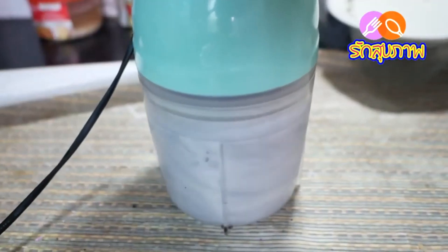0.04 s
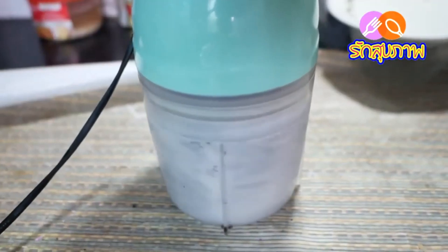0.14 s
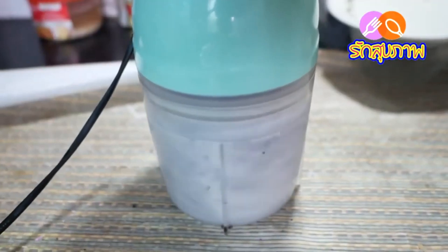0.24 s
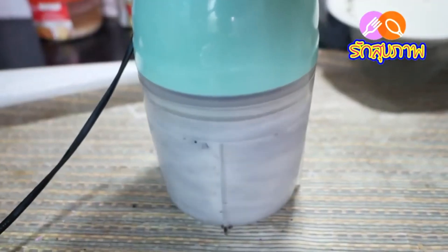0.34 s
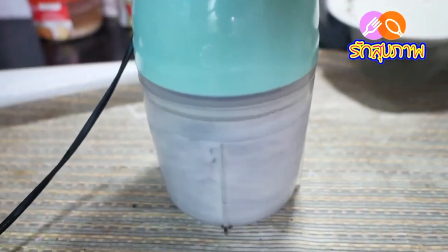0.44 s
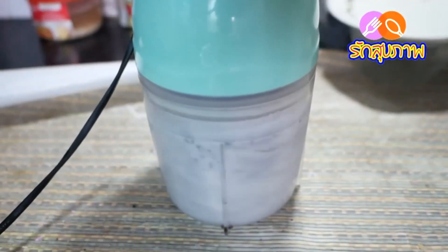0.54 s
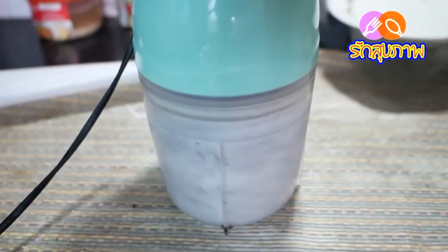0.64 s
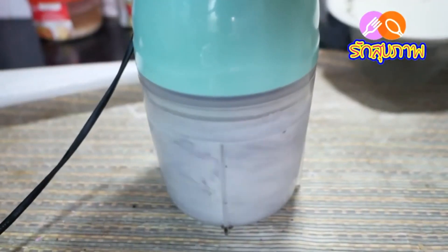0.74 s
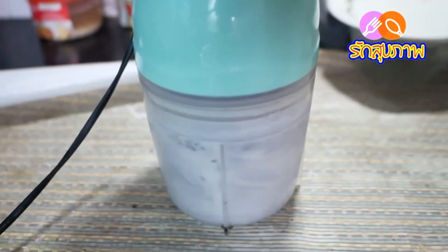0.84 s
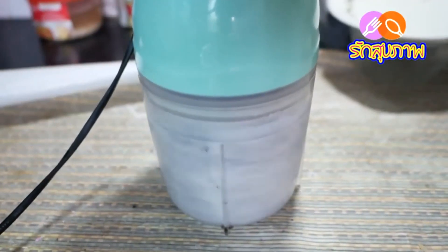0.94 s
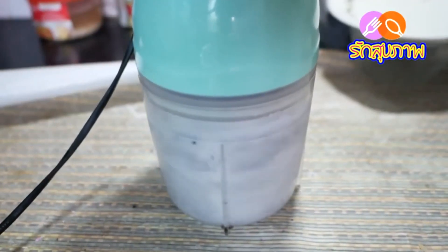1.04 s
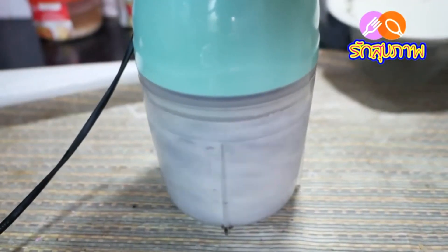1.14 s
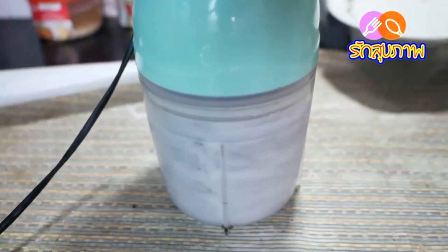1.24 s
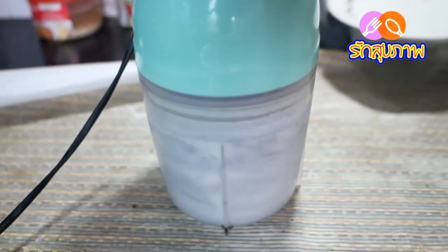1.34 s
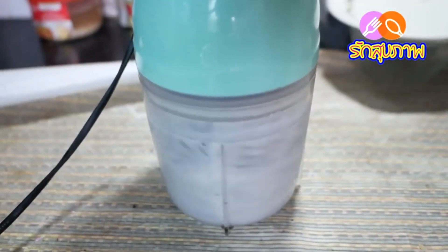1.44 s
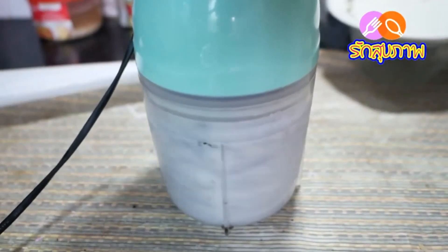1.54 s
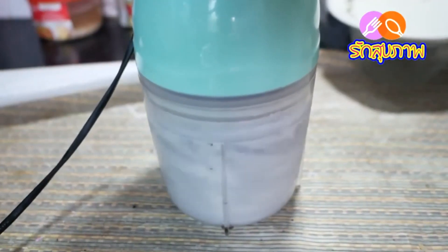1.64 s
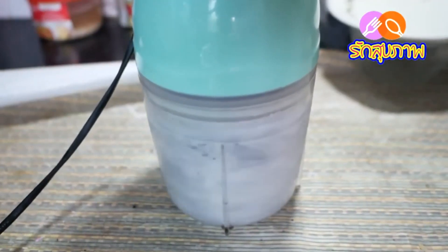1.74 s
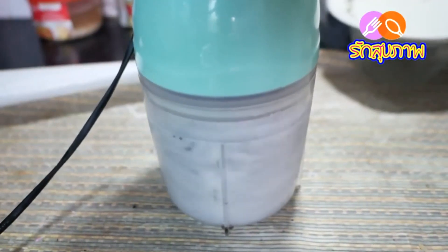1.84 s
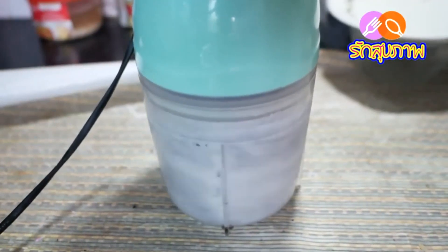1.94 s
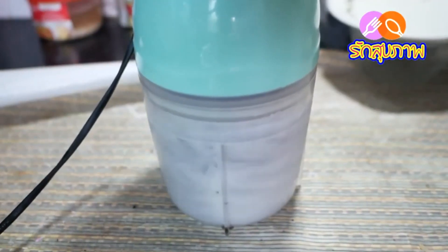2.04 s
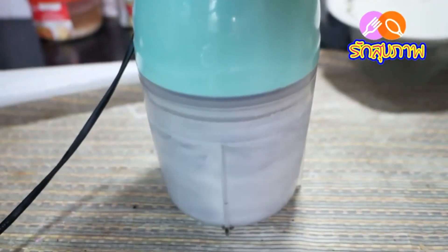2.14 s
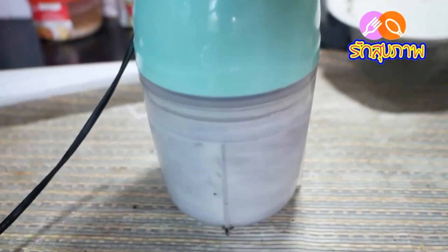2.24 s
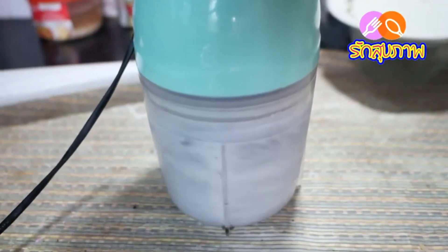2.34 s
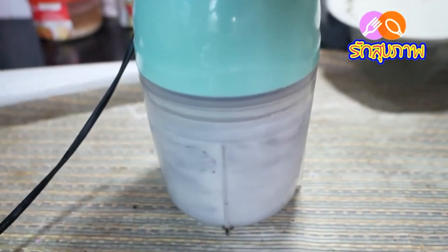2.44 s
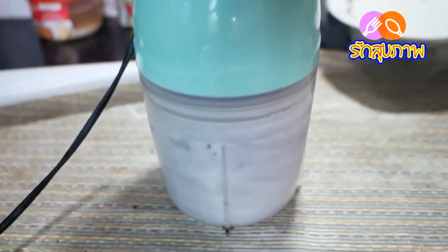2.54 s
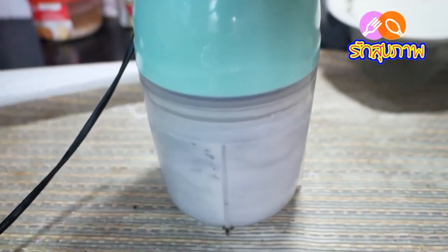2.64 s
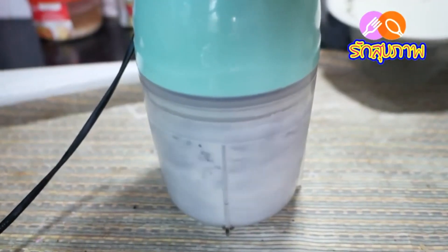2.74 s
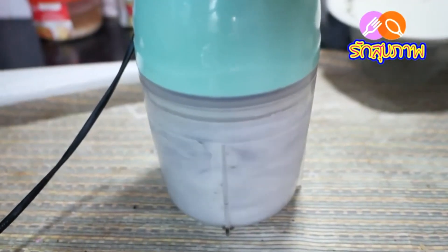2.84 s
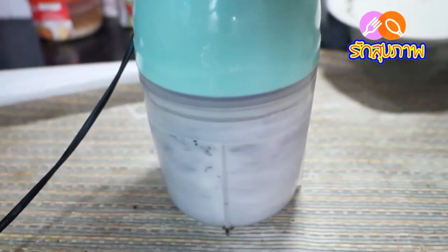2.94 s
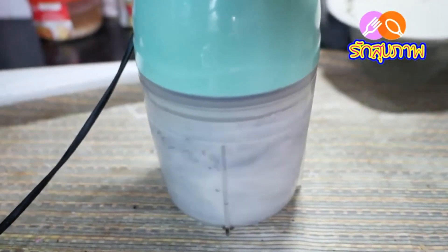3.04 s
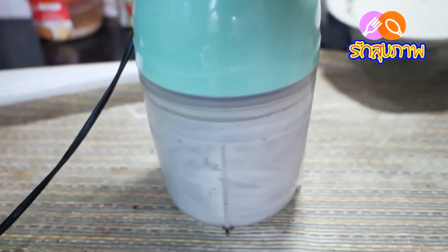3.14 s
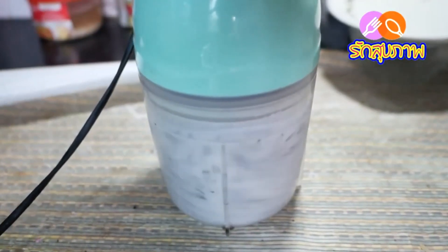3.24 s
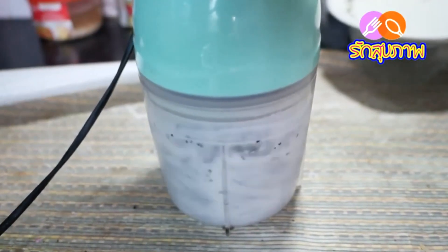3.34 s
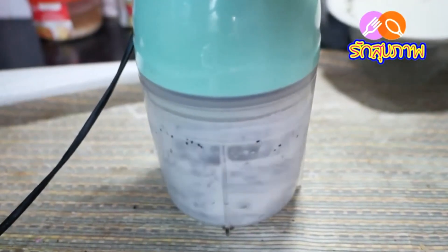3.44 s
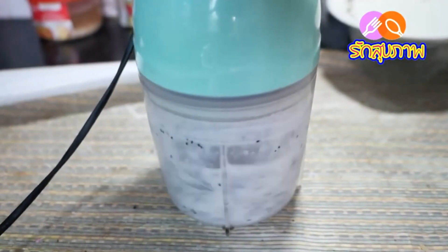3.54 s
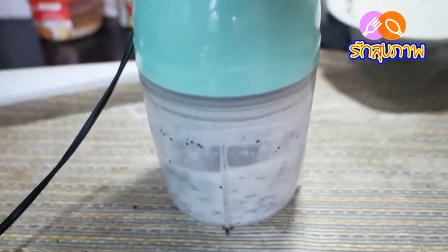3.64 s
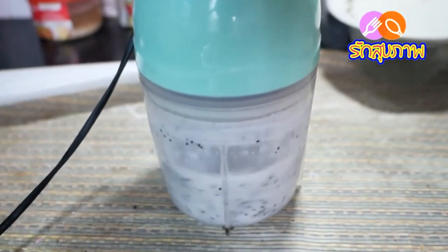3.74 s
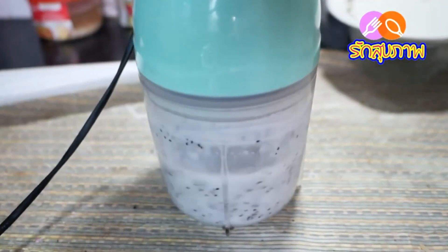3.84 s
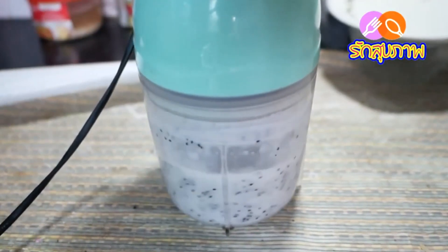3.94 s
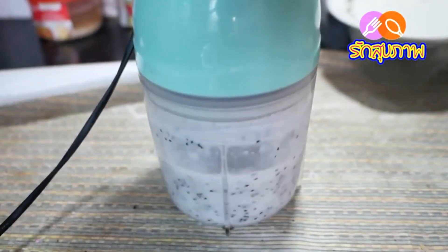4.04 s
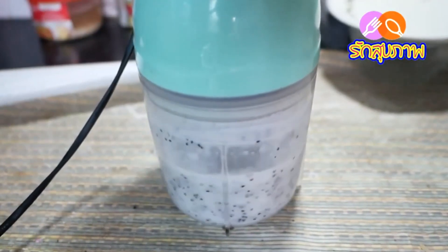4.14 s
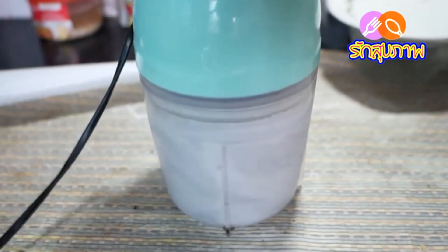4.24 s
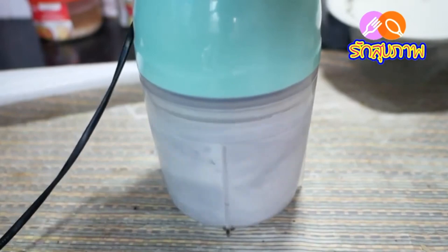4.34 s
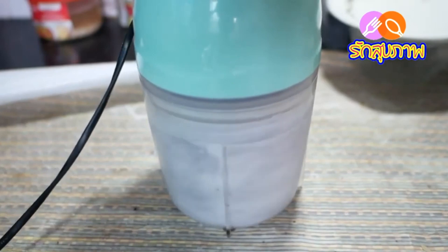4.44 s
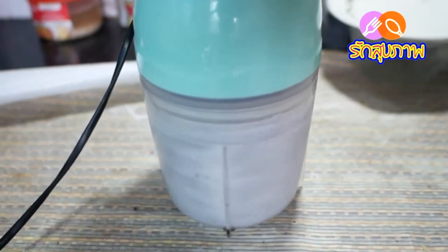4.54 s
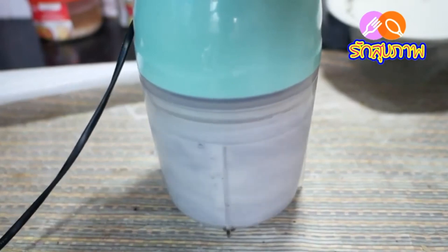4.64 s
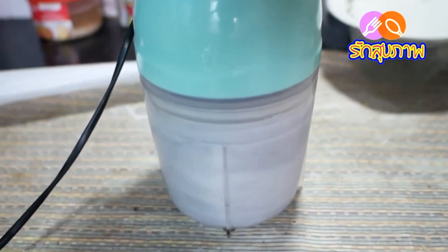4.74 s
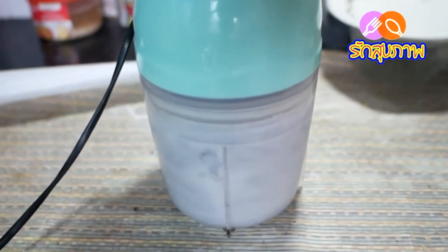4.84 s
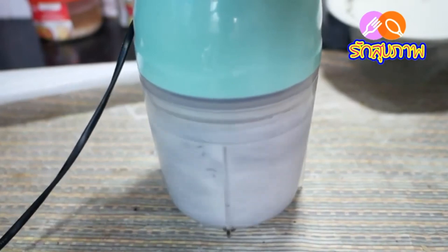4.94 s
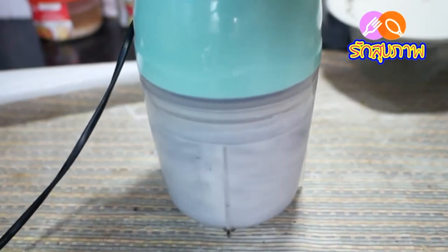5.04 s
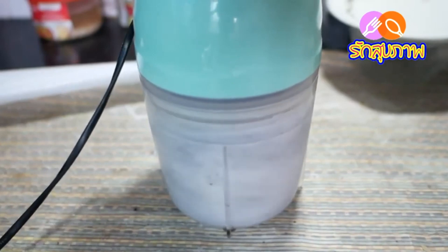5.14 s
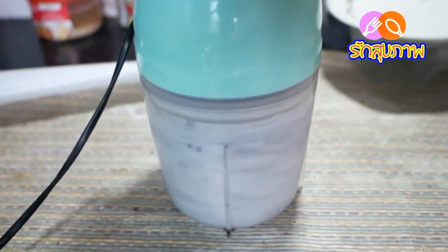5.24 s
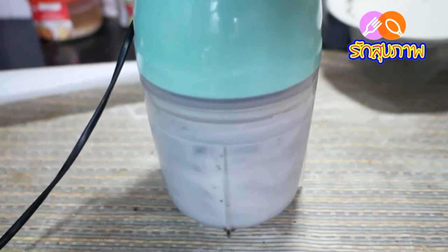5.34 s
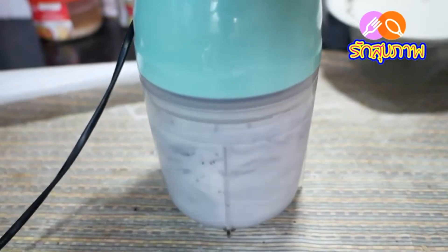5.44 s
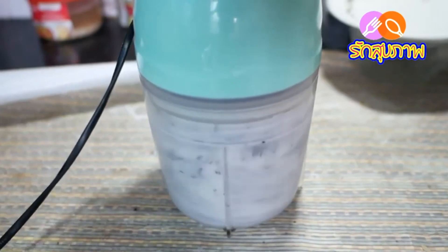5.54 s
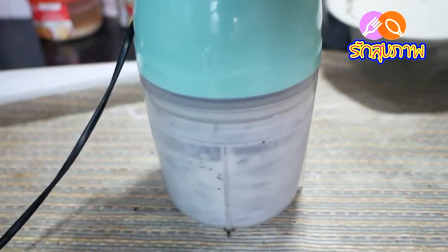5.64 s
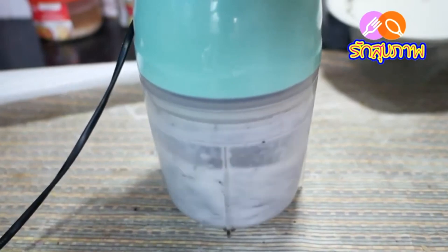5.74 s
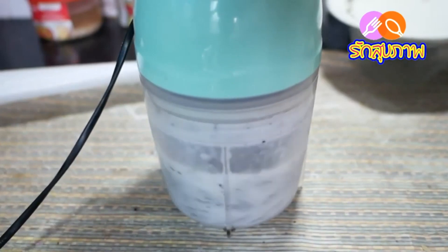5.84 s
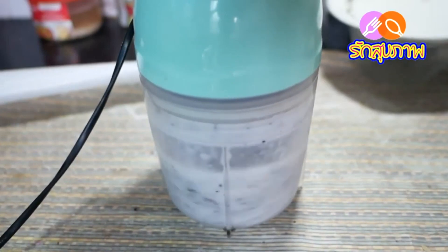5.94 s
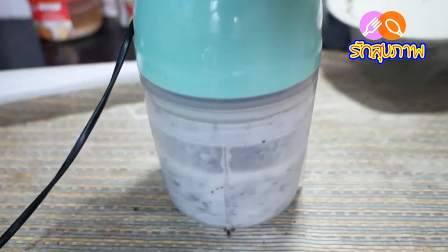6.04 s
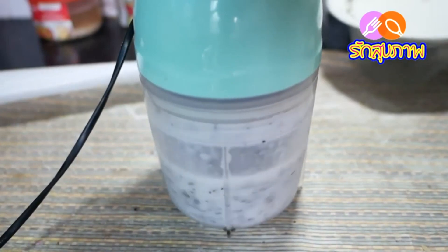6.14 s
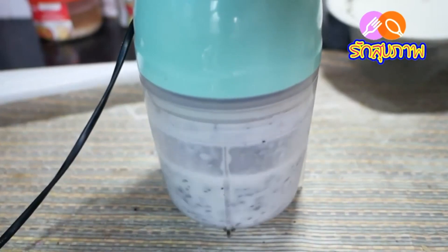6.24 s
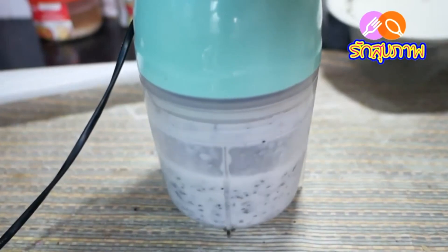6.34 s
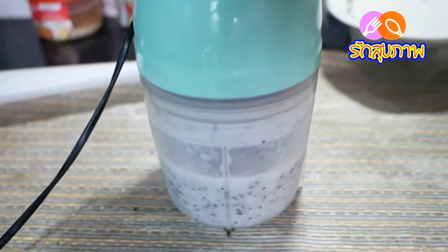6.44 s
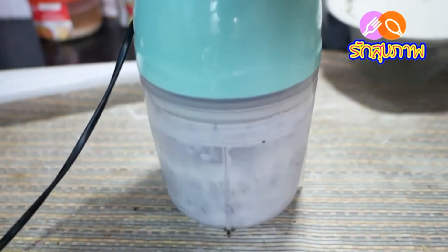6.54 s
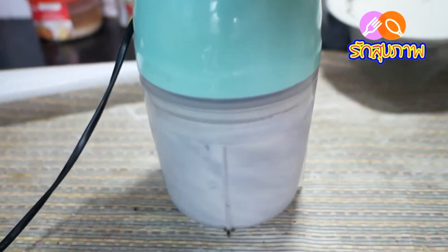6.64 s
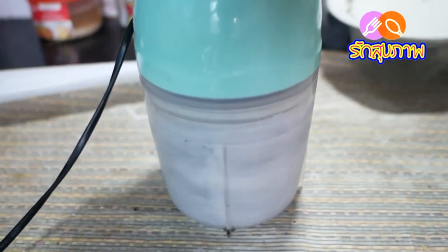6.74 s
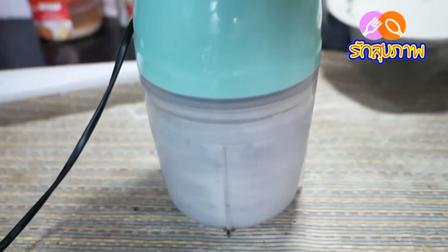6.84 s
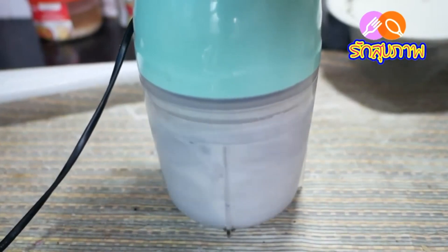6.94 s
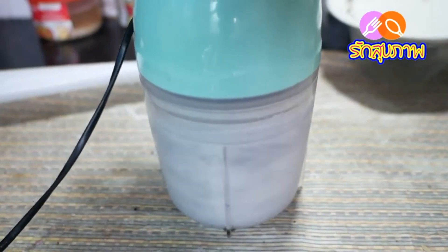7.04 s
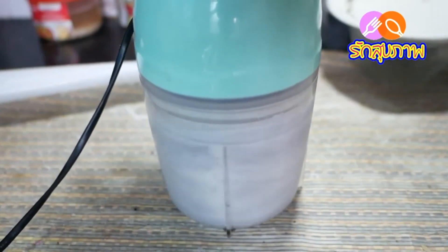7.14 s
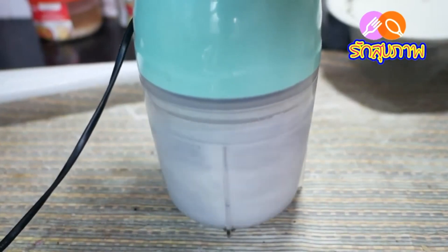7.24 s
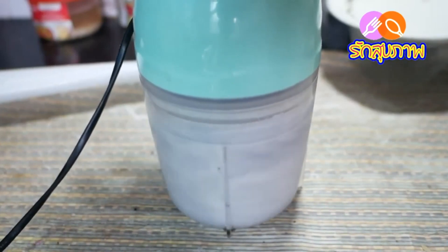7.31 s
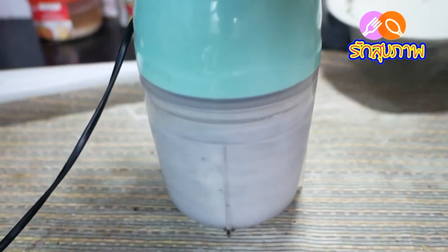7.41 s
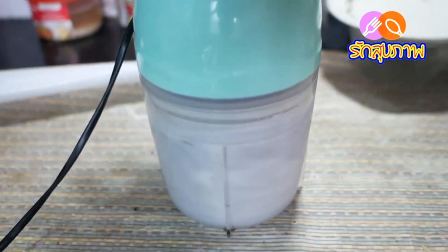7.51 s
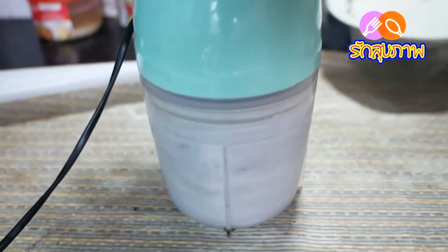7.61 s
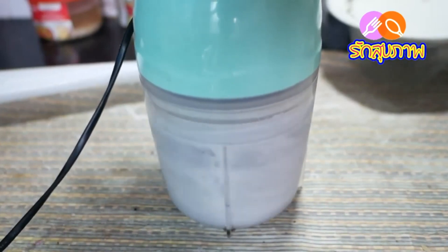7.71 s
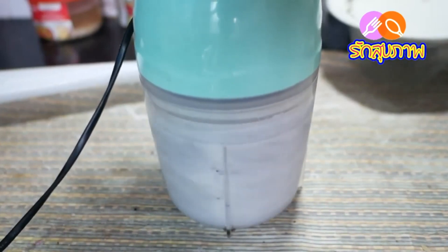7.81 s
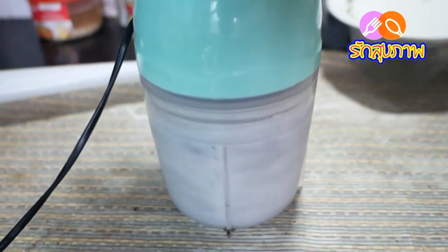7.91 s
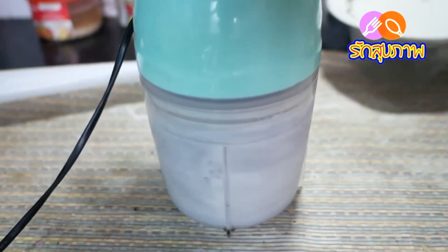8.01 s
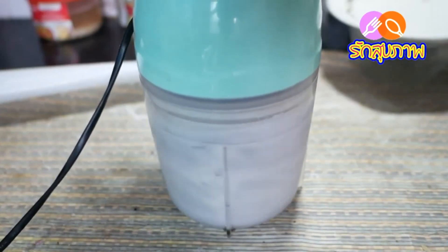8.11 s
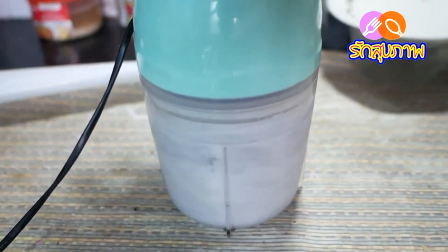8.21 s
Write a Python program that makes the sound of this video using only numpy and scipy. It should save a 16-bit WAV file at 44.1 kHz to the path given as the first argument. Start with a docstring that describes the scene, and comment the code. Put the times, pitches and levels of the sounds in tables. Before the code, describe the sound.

A small blender is already running at 0 s, close and loud, in a dry home kitchen. Ice lumps knock the plastic jar irregularly, with sharp cracks early on, over coarse grinding, wet slosh and bright gritty hiss. A thin, high motor whine around 2.5-3 kHz glides up as the ice gives way, and the grind gradually becomes finer. At about 2.9 s the power cuts and the whine vanishes; slush keeps swirling, slaps down the wall around 3.2 s, gurgles lower and fades into sparse ticks over faint room hush and hum. A switch clacks at 4.3 s, and a shorter burst rattles up until 5.1 s. One hard crack at 5.3 s leads into slowing slosh and light ticks, nearly quiet by 6.5 s. Another click at 6.65 s starts the third burst, its whine rising again, duller knocks and steady crunching continuing until the abrupt end near 8.4 s.

```python
"""Kitchen table, close microphone: a small blender crushes ice and fruit in three bursts.
Lumps ring the plastic jar as damped modes; filtered random grains make the grinding, sloshing and spray.
Ice cracks and switch clicks are clicks with a short crumble; the motor's shaft multiples whine up as the load eases.
Between bursts the slush swirls to rest and the last lumps tick on the wall; room, hush and hum lie behind."""
import sys
import numpy as np
from scipy import signal
from scipy.fft import rfft, irfft
from scipy.io import wavfile
from scipy.ndimage import uniform_filter1d

SR = 44100
rng = np.random.default_rng(int(sys.argv[2]) if len(sys.argv) > 2 else 0)


def inscribe(sig):
    """Save sig as 16-bit PCM at rate SR to the path in sys.argv[1].

    A 1-D sig is mono; a 2-D sig holds one channel per row.
    Samples are clipped to [-1, 1] before scaling.
    """
    pcm = np.round(np.clip(np.atleast_2d(sig).T, -1, 1) * 32767)
    wavfile.write(sys.argv[1], SR, pcm.astype(np.int16))


N = 364866
TIME_S = np.arange(N) / SR

# hush spectrum: f/Hz, relative density/dB
HUSH_SPECTRUM = [(15, -40.5), (25, -23), (101, -11), (131, -8.5), (278, -14.5), (309, -20.5), (354, -16),
                 (1000, -17.5), (1460, -30.5), (1960, -22.5), (2240, -23.5), (13500, -44), (15000, -50)]
HUSH_RMS_DB, MAINS_HZ, MAINS_PEAK_DB = -61.5, 51, -72.5
# kitchen decay: f/Hz, t60/s
ROOM_T60 = [(150, 0.24), (1000, 0.12), (4000, 0.14), (12000, 0.12)]
BAND_LIMIT_HZ = 15800

# switch presses: on t/s, off t/s, swirl hold after off/s, settling rate/(dB/s),
# offsets: coarse ice/dB, fine ice/dB, slush/dB, whine/dB
PRESSES = [(-0.07, 2.87, 0.41, 32.5, 3, 0.5, 1, 0), (4.306, 5.13, 0.36, 27, 1.5, 0, 0, -3.5),
           (6.656, 8.4, .4, 30, 1.5, 0.7, 1.5, 1)]
# powered shaft, one curve per press, rising overall as the ice gives way: t/s, f/Hz
SHAFT_SPEED = [
    [(0, 158), (.66, 172.5), (.8, 178), (1.1, 185.2), (1.25, 187), (1.55, 192.8), (1.95, 196.5),
     (2.22, 198.6), (2.34, 195), (2.85, 201.8)],
    [(4.35, 150), (4.7, 172), (4.87, 185.5), (4.95, 190.5), (5.06, 193.7)],
    [(6.7, 150), (7.0, 174), (7.18, 185.5), (7.28, 190.7), (7.38, 193.8), (7.62, 198), (8.27, 199.5)],
]
BITE_S, COAST_S = 0.035, 0.55  # bite rise; time constant of the coast-down

# motor tones: multiple of shaft speed, relative level/dB
MOTOR_TONES = [(1, -12), (2, -3), (15, 0), (16, -6), (17, -13)]
# gain of the housing resonance on each tone: f/Hz, gain/dB
HOUSING_GAIN = [(200, -23), (2400, -25.5), (2690, -15), (2750, -7), (2782, 2.5), (2815, -2), (2860, 2),
                (2900, 4), (2935, -1.5), (2960, -5), (2985, -8), (3030, -9), (3080, -11), (3180, -9),
                (3240, -14), (3400, -12), (6000, -15)]
WHINE_DB, REF_SPEED_HZ = -30, 191.9  # base level at the reference speed
WHINE_DB_PER_HZ, WHINE_FADE_DB_PER_S = 0.02, 200

# slush layers, one row each: base level/dB, surge at the bite/dB, surge time constant/s,
# drift as ice gets finer/(dB/s), drop at collapse/dB
GRIND_LAYER = (-26, -6.5, 0.66, -2.13, 7)
SLOSH_LAYER = (-32, 12, 0.18, -1.42, 1.5)
SPRAY_LAYER = (-28.5, 5, 0.41, -2, 9)
# slush slapping down the wall after switch-off: delay/s, spread/s, extra slosh level/dB
WALL_SLAP = (0.33, 0.13, 7.6)
SAG_DB_PER_S, COLLAPSE_S = 10.5, 0.27
# sinking slush: start f/Hz, fall rate/(Hz/s), rise/s, width/Hz, level re slosh/dB
SLUMP_GURGLE = (469.5, 430, 0.9, 127.5, -3.5)

# jar and table modes, the lowest table row a 100 Hz hum of the motor: f/Hz, width/Hz, relative level/dB
BASE_MODES = [(188.6, 100, -12), (228, 46, -8.5), (393, 35, 7), (424, 34, -12.5), (444.6, 47, 9),
              (521, 21, -1.5)]
WALL_MODES = [(786, 12, -12.5), (963, 27, -29), (1202, 29, -7), (1288, 115, 2), (1499, 70, -1.5),
              (1737, 80, 1), (1970, 32, -1), (2120, 51, -39.5)]
EDGE_MODES = [(2240, 1300, 0), (2450, 220, 4), (2600, 330, -1), (2680, 180, -14.5)]
TABLE_MODES = [(103.4, 7.5, 1.5), (120, 8.3, 1.5), (190, 15, 5.5), (217.8, 15, 1.5), (265, 14, -2)]
# thin upper wall of the jar: f/Hz, width/Hz, relative level/dB
RIM_MODES = [(2745, 150, -3.5), (3407, 120, 2.5), (3795, 82, 2.5), (4500, 180, -1.5), (4840, 100, -3.5),
             (7420, 200, -16.5)]
# liquid, fine spray and snap spectra: f/Hz, relative density/dB
SLOSH_SPECTRUM = [(25, -32.5), (55, -28.5), (82, -29), (100, -5.5), (145, -13), (190, -6.5), (290, -12.5),
                  (500, -5.5), (900, 0.5), (1500, -9), (2500, -6), (3200, -8.5), (6000, -12.5),
                  (15000, -55.5)]
SPRAY_SPECTRUM = [(300, -20.5), (1500, 2.5), (2600, 0.5), (3150, 0), (4200, -1), (5200, -1), (6200, -5.5),
                  (8000, -6.5), (10000, -12), (13000, -23), (15500, -34)]
SNAP_SPECTRUM = [(300, -18), (1500, -2), (3000, 0.5), (5500, 2), (8000, 0), (10500, -3), (15500, -19.5)]
# clack spectrum: multiple of its pitch, relative density/dB
CLACK_SPECTRUM = [(.15, -20.5), (.45, -13.5), (.8, -6), (1, 0.5), (1.25, -7.5), (2, -8.5), (4, -19),
                  (10, -44)]

# ice splitting or ticking, the blade biting at a start, and the switch clicking at 4.304 and 6.655 s:
# t/s, snap level/dB, snap top f/Hz, clack level/dB, clack f/Hz, crumble time constant/s
CRACKS_AND_CLICKS = [(0.0204, -23.0, 9100, -33.0, 550.0, 0.0018),
                     (0.0506, -19, 6500.0, -29, 1250.0, 0.0015), (0.1415, -27, 8900, -30.0, 3200.0, 0.0012),
                     (0.2189, -31, 9600, -22, 1440, 0.0012), (0.3285, -37, 14300, -27, 2000.0, 0.0012),
                     (0.84, -28, 13700, -26, 550.0, 0.0022), (3.0354, -30.5, 9000.0, -33, 550.0, 0.007),
                     (3.0952, -31, 14000.0, -44, 1050.0, 0.0088), (3.2348, -23, 6400, -27.5, 750.0, 0.0081),
                     (3.2778, -33, 14000.0, -35.0, 900.0, 0.008),
                     (3.2897, -28.0, 9000.0, -25.0, 1250.0, 0.013),
                     (3.313, -39, 6500.0, -30, 2000.0, 0.0018), (3.337, -37, 4000.0, -35, 1040, 0.0036),
                     (3.375, -32, 5000.0, -35, 3200.0, 0.0012), (3.395, -37.0, 9000.0, -33, 1250.0, 0.0012),
                     (3.429, -51, 6500.0, -35, 900.0, 0.008), (3.504, -58, 14000.0, -42, 900.0, 0.0034),
                     (3.519, -48, 6500.0, -43, 1450.0, 0.0012), (3.531, -53.0, 9000.0, -52, 750.0, 0.0012),
                     (3.5467, -48, 9000.0, -38.5, 900.0, 0.0019), (3.5645, -58, 4000, -43, 1700, 0.002),
                     (3.583, -45, 11000, -51, 1250, 0.0029), (3.6249, -49.0, 5000.0, -38.5, 880, 0.0012),
                     (3.6383, -51.0, 9000.0, -50, 2000.0, 0.0014),
                     (3.673, -62.0, 14000.0, -74.0, 3200.0, 0.0012),
                     (3.7038, -52, 4000.0, -49, 900.0, 0.008), (3.7405, -45, 6500.0, -43.0, 550.0, 0.0031),
                     (3.762, -58, 9000.0, -51, 900.0, 0.002), (3.7833, -51.0, 4000.0, -44, 1050.0, 0.0012),
                     (3.8196, -58, 4000.0, -53, 1050.0, 0.0012), (3.9421, -55, 4000.0, -54, 1450.0, 0.0022),
                     (3.972, -58, 4000.0, -74, 1250.0, 0.0014), (3.9892, -67, 6500.0, -50.5, 905, 0.0012),
                     (4.0925, -67, 6500.0, -49.5, 900.0, 0.0019), (4.3042, -50, 6500, -49, 1240, 0.004),
                     (4.3145, -50, 6500, -27.5, 1040, 0.007), (4.3323, -32, 9000, -21, 1240, 0.004),
                     (4.338, -39, 9000.0, -19.5, 2800.0, 0.007), (4.379, -26, 14000.0, -31, 750.0, 0.0012),
                     (4.4234, -24, 9000.0, -22, 1050.0, 0.0018), (4.5452, -29, 9000.0, -30, 3200.0, 0.008),
                     (4.6236, -24, 9000.0, -35, 1050.0, 0.0017), (5.306, -19, 3970, -22, 2880, 0.00061),
                     (5.3943, -38, 14000.0, -26, 2400.0, 0.0019),
                     (5.44, -37.0, 14000.0, -39.0, 2000.0, 0.0012), (5.45, -39, 14000.0, -34, 750.0, 0.008),
                     (5.4727, -32.0, 14000.0, -25.5, 910, 0.0018), (5.564, -46, 6500, -27.5, 1700, 0.004),
                     (5.5888, -37, 9000.0, -27, 1070, 0.008), (5.6026, -51, 9000.0, -34.0, 1700.0, 0.008),
                     (5.6318, -36.5, 6500.0, -43, 900.0, 0.0013),
                     (5.645, -56.0, 14000.0, -45, 2400.0, 0.008),
                     (5.6566, -43, 9000.0, -35.0, 1050.0, 0.0043),
                     (5.681, -45, 14000.0, -45, 1050.0, 0.0026), (5.7107, -41, 4920, -44, 1050.0, 0.0012),
                     (5.741, -54, 4000.0, -44.0, 1250.0, 0.0012),
                     (5.762, -63, 14000.0, -66.0, 750.0, 0.0029), (5.794, -45.0, 4000.0, -33, 910, 0.0044),
                     (5.8402, -54, 14000.0, -67.0, 2400.0, 0.0035), (5.86, -57, 5000, -37, 1280, 0.005),
                     (5.8893, -56, 4000.0, -42, 1250.0, 0.0022), (5.903, -54.0, 9000.0, -44, 550.0, 0.0012),
                     (5.918, -62.0, 14000.0, -45, 1050.0, 0.0026),
                     (5.963, -42.5, 4000.0, -48, 1250.0, 0.0028), (6.037, -69, 4000.0, -49, 1250.0, 0.0053),
                     (6.0791, -55, 6500.0, -63, 2800.0, 0.0015), (6.092, -54, 5000.0, -48, 1250.0, 0.0012),
                     (6.1496, -62, 9000.0, -61, 1700.0, 0.0012),
                     (6.1937, -45.0, 6500.0, -38, 1050.0, 0.0012), (6.25, -61, 8000, -53, 950, 0.004),
                     (6.3804, -70.5, 6500.0, -49, 900.0, 0.0056),
                     (6.4302, -65, 4000.0, -53, 1050.0, 0.0022), (6.5635, -65.0, 5000.0, -51.5, 895, 0.006),
                     (6.655, -46, 9000.0, -46, 1250.0, 0.0068), (6.668, -46, 9000, -22, 740, 0.006),
                     (6.683, -33, 9000, -29, 1250, 0.006), (6.6926, -20, 14000.0, -40, 550.0, 0.0016),
                     (6.735, -22, 13700, -23, 910, 0.0012), (6.858, -26, 14000.0, -40, 2800.0, 0.0024),
                     (7.0004, -24.5, 6500.0, -22.5, 2700, 0.002),
                     (7.1178, -36, 14000.0, -30, 3200.0, 0.0012), (7.6244, -25, 5030, -26, 3200.0, 0.0032),
                     (7.7663, -28.5, 14000.0, -28, 1448, 0.0012),
                     (7.8394, -26, 14000.0, -28, 2000.0, 0.00097)]
# random chips: snap re spray/dB, spread/dB, clack re snap/dB, rise after switch-off/(dB/s)
CHIP_LEVELS = (-7, 4.5, -3.5, 3)
CHIP_TOP_HZ, CHIP_CLACK_HZ, CHIP_CRUMBLE_S = 11000, 2000, 0.0014  # clack f is the centre of a spread
# big lumps on the jar: t/s, relative wall level/dB, relative thump re wall/dB, brightness/(dB/octave)
BIG_KNOCKS = [(0.0802, -8.5, -14.0, -13.5), (0.147, -9, -12.0, -7), (0.2501, -4.5, -15, 6),
              (0.2583, -6, -9, 7), (0.2717, 0, -17.5, -7.5), (0.2804, -4, -24, -3), (0.3659, -8, -11, -3),
              (0.4053, -6, -12, 5), (0.4159, -7.5, -28.5, 3), (0.4451, -3.5, -17.0, 4),
              (0.4563, -13, -8, -12.0), (0.501, -3.5, -14, -11), (0.5193, -1.5, -14, 8),
              (0.5548, -5, -21, 4), (0.6004, -2.5, -17, 3), (0.6177, -12, -6, -2), (0.6399, -2.5, -16.5, 5),
              (0.6563, -8.5, -23.5, 7), (0.6829, -7.5, -11, -2), (0.6973, -11.5, -15, -1.0),
              (0.7488, -2.5, -17.5, 5.5), (0.7765, -5.5, -15, 5), (0.7897, -5.5, -26, 12.5),
              (0.8021, -14, -6, -7.0), (0.8262, -4, -20, -2), (0.8624, -14.5, -9, 0),
              (0.8749, -3, -16.5, 2), (0.89, -10, -12, 4), (0.9139, -7, -14, 6.0), (0.9212, -1.5, -18, 10),
              (0.9325, -12, -23, 7), (0.9693, -8, -31, 5), (1.0043, -5, -25, -4), (1.0516, -14, -22, -2),
              (1.0828, -12, -9, 5), (1.1066, -5.5, -18.5, 9), (1.1537, -5.5, -15, -1),
              (1.1605, -9.5, -21, 11), (1.1843, -2, -18, 6), (1.195, -7, -17.5, 3), (1.2716, -1, -22, 8.0),
              (1.2901, -15, -10, 4), (1.3174, -7.5, -11.5, 3), (1.3333, -6, -15, 12.0),
              (1.3494, -8, -32, -3), (1.3825, -4.5, -24, -21), (1.3964, -15, -3, -1), (1.4375, -7, -14, 2),
              (1.4684, -6, -20, 0), (1.535, -4, -12.5, -2), (1.5433, -3.5, -14.0, -1),
              (1.5722, -20, -13.0, -8), (1.6227, -11, -12, -5), (1.6735, -9, -10, 4),
              (1.7062, -5, -15.5, -2.0), (1.7344, -7.5, -11, 0), (1.7532, -7.5, -23, -6),
              (1.761, -3, -14, 12.0), (1.8546, -3.5, -12.5, 9), (1.8683, -7.5, -19, 7.0),
              (1.9034, -7, -15, 3.5), (1.9485, -14, -3, -2), (1.9632, -11, -21, -12.0),
              (1.9812, -4.5, -9.5, -4), (2.0152, -5, -20, 5.0), (2.0804, -11, -22, 8),
              (2.0824, -13, -18, 12.0), (2.0979, -13.5, -18, -3), (2.1266, -5.5, -29, 6.0),
              (2.1577, -5, -26, 6.0), (2.2023, -4.5, -18.0, -7), (2.2209, -3, -27, -3),
              (2.2495, -12, -8, -11), (2.26, 0, -18, 9), (2.277, -4, -17.0, -3), (2.2969, -9, -38, -1.0),
              (2.3105, -12, -10, 0), (2.3584, -7.5, -21, 13), (2.4212, -3, -18.5, -5),
              (2.4507, -9.5, -8.0, -8), (2.4681, -5.5, -27, 8), (2.5184, -11, -19, 2.0),
              (2.5485, -1.5, -22, 3), (2.5594, -8.5, -11.0, -1.0), (2.6569, -6, -20, 1),
              (2.7147, -11, -29, -1.0), (2.769, -15, -15, 4.0), (2.7757, -7, -24, -2.0),
              (2.8249, -7.5, -14, 3.0), (2.8349, -8.5, -11.0, -5.0), (2.8465, -5, -16.0, 8),
              (2.8664, -15.5, -14, 5.0), (2.8788, -1.5, -13, 3), (2.8907, -16, -14, -4),
              (2.9451, -16, -15.0, -7), (2.9824, -9.5, -23.0, -11), (3.0449, -7, -15, 1),
              (3.0902, -23, -8, -12.0), (3.102, -4.5, -22, 0), (3.1407, -9, -22, -2.0),
              (3.1562, -8.5, -28, -4.0), (4.3305, -10.5, -18.5, 11), (4.3397, -9, -13, 11),
              (4.3511, -19, -22.5, 2), (4.4515, -8, -23.0, 18), (4.4628, -11.5, -19, 10),
              (4.5061, -2, -18, 8), (4.5395, -12.5, -14, -3), (4.5554, -5.5, -13, 6), (4.5628, -5, -26, 0),
              (4.6006, -14, -6, -1.0), (4.6475, -8.5, -18, -6), (4.6837, -9.5, -16, -9.0),
              (4.8071, -9, -24, -5.5), (4.8193, -7.5, -28, -1), (4.9047, 0, -16, 9),
              (4.9902, -5, -12.5, -5), (5.0321, -2.5, -21.5, 3), (5.0591, -6, -17, 3),
              (5.0828, -6, -16, 13), (5.0935, -10, -8, -6), (5.1274, -9, -20, -7), (5.1367, -6, -15.0, -3),
              (5.1759, -3.5, -13.0, 1), (5.2691, -8.5, -10, -1), (5.3429, -3, -17.0, 7),
              (5.4063, -11.5, -14, -6.0), (5.4644, -6, -22.0, 14), (5.5326, -8, -24, 8),
              (6.6698, -21, -14, -11), (6.6814, -19, -24.0, -2), (6.6866, -7.5, -30, 2.0),
              (6.7095, -5.5, -35, -12.0), (6.8804, -6.5, -22.0, -9), (6.9273, -8, -16, -16),
              (6.9583, -5, -33.0, 3), (7.003, -5.5, -14.5, -11), (7.0398, -8.5, -11, -16),
              (7.074, -14, -8, -10), (7.1351, -9, -11, 3), (7.1416, -11, -17.0, -11), (7.1575, -12, -24, 1),
              (7.1895, -4.5, -13.5, -11), (7.2046, -10.0, -21, -7), (7.2795, 0, -23, -7),
              (7.3, -8, -13, -4), (7.3314, -9, -27.0, 3), (7.4398, -8, -18, -4), (7.4619, -7.5, -14, -8.0),
              (7.4815, -4.5, -22, 2), (7.6244, -10.5, -32.0, 7.0), (7.6659, -10, -16, -1),
              (7.7222, -3, -20, -9), (7.7363, -5.5, -20, -2), (7.8195, -9, -16, -14),
              (7.8741, -10, -12, -9.0), (7.8857, -5.5, -22, -2), (7.8979, -10, -15, 4),
              (7.9072, -8.5, -16, -5), (7.9144, -6.5, -12, 3), (7.9665, -6, -20.5, 1), (7.9801, -4, -27, 8),
              (8.0763, -7, -30, -16), (8.0898, -16, -23, -7), (8.1447, -6, -36, -5),
              (8.1894, -8, -18.0, -1), (8.2094, -4, -16.0, -14), (8.2214, -8, -18, -8),
              (8.2298, -8, -29.0, -16)]
# random lighter lumps: relative wall level/dB, spread/dB, relative thump re wall/dB, thump spread/dB
SMALL_KNOCK_LEVELS = (-16.5, 6.5, -21.5, 3.5)


def amp(db):
    """Amplitude ratio from dB."""
    return 10 ** (np.asarray(db) / 20)


def evened(x):
    """Signal at rms 1."""
    return x / np.sqrt(np.mean(x ** 2) + 1e-20)


def read(points, hz):
    """Table value, linear on a log-frequency axis."""
    f, value = np.transpose(points)
    return np.interp(np.log(hz + 1), np.log(f + 1), value)


def curves(rows):
    """Table columns interpolated at every sample."""
    s, *columns = np.transpose(rows)
    return [np.interp(TIME_S, s, column) for column in columns]


def add(mix, s, sound):
    """Mixes a sound in place at time s, cut at the end."""
    part = mix[max(round(s * SR), 0):][:len(sound)]
    part += sound[:len(part)]


def noise():
    """White noise over the scene, rms 1."""
    return rng.standard_normal(N)


def wander(hz, size=16384):
    """Slow random signal of rms 1, rolled off above hz."""
    f = np.arange(size // 2 + 1) * SR / N
    slow = irfft(rfft(rng.standard_normal(size)) / (1 + (f / hz) ** 4))
    return np.interp(TIME_S, np.linspace(0, N / SR, size), evened(slow))


def colour(points, ripple_db=0, size=4096):
    """Minimum-phase impulse response of a spectrum; ripples stand for many small resonances."""
    hz = np.fft.rfftfreq(size, 1 / SR)
    ripple = evened(uniform_filter1d(rng.standard_normal(len(hz)), size=6))
    log_gain = np.log(amp(read(points, hz) + ripple_db * ripple))
    mirrored = np.r_[log_gain, log_gain[-2:0:-1]]
    return np.fft.ifft(np.exp(np.conj(signal.hilbert(mirrored)))).real


def through(x, response):
    """Signal filtered by an impulse response, back at rms 1."""
    return evened(signal.oaconvolve(x, response)[:N])


def ring(modes, scatter_db=0, detune=0, size=1500):
    """Damped modes; weights and tuning vary with the place of the blow."""
    hz, width, db = np.transpose(modes)[:, :, None]
    weight, shift = rng.standard_normal((2, len(modes), 1))
    t = np.arange(size) / SR
    decay = np.exp(-np.pi * width * t)
    tone = np.cos(2 * np.pi * hz * (1 + detune * shift) * t)
    response = (width * amp(db + scatter_db * weight) * decay * tone).sum(0)
    # nothing radiates far below the lowest mode
    highpass = signal.butter(1, hz.min() / 2, "high", fs=SR, output="sos")
    return signal.sosfilt(highpass, response)


def blow(x):
    """Hit scaled to the energy of 10 ms at rms 1."""
    return x * np.sqrt(SR / 100 / np.sum(x ** 2))


def contact(x, hz, order=2):
    """Low-pass: finite contact time rounds off a blow."""
    lowpass = signal.butter(order, min(hz, SR / 2.1), fs=SR, output="sos")
    return signal.sosfilt(lowpass, x)


def scattered(count):
    """Sample indices, one at random in each of count equal slots."""
    return ((np.arange(count) + rng.random(count)) * N / count).astype(int)


def room_hush():
    """Steady shaped noise of the room."""
    return amp(HUSH_RMS_DB) * through(noise(), colour(HUSH_SPECTRUM, size=8192))


def mains_hum():
    """Faint steady sine."""
    return amp(MAINS_PEAK_DB) * np.sin(2 * np.pi * MAINS_HZ * TIME_S)


def kitchen(x, size=16384):
    """Diffuse tail of decaying noise, each band dying at its own rate."""
    hz, t, z = signal.stft(rng.standard_normal(size), SR, nperseg=256)
    decay = amp(-60 * t / read(ROOM_T60, hz)[:, None])
    tail = signal.istft(z * decay, SR, nperseg=256)[1]
    tail *= np.minimum(np.arange(len(tail)) / SR / 0.0034, 1) ** 2  # 3.4 ms onset
    return signal.fftconvolve(x, tail / np.linalg.norm(tail))[:N]


def presses():
    """Per sample: s since switch-on, s since switch-off, rest of the current press row."""
    rows = np.array(PRESSES)
    current = np.maximum(np.searchsorted(rows[:, 0], TIME_S) - 1, 0)
    on, off, *rest = rows[current].T
    return np.maximum(TIME_S - on, 0), np.maximum(TIME_S - off, 0), *rest


def shaft():
    """Shaft speed/Hz: follows its curve under power, then coasts down exponentially."""
    speed_hz = np.zeros(N)
    for (on, off, *_), curve in zip(PRESSES, SHAFT_SPEED):
        coasting = np.exp(-np.maximum(TIME_S - off, 0) / COAST_S)
        speed_hz = np.where(TIME_S >= on, curves(curve)[0] * coasting, speed_hz)
    return speed_hz


def motor(speed_hz, turns, flutter_db=1.8):
    """Shaft multiples glide through the housing resonance and flutter with the load."""
    age_s, idle_s, *_, press_db = presses()
    speed_db = WHINE_DB_PER_HZ * (speed_hz - REF_SPEED_HZ)
    whine_db = WHINE_DB + press_db + speed_db - WHINE_FADE_DB_PER_S * idle_s
    out = np.zeros(N)
    for multiple, db in MOTOR_TONES:
        housing_db = read(HOUSING_GAIN, multiple * speed_hz)
        level_db = whine_db + db + housing_db + flutter_db * wander(hz=45)
        out += amp(level_db) * np.sin(2 * np.pi * multiple * turns)
    return out * np.minimum(age_s / BITE_S, 1)


def work(swell_db=1.45, lumpy_db=2.0):
    """Grind, slosh and spray levels/dB: surge at the bite, drift, then sag, collapse and settling."""
    age_s, idle_s, hold_s, settle_db_per_s, coarse_db, fine_db, slush_db, _ = presses()
    fallen_s = np.maximum(idle_s - hold_s, 0)
    collapse = np.minimum(fallen_s / COLLAPSE_S, 1)
    bite_db = 40 * np.log10(np.clip(age_s / BITE_S, .01, 1))
    heaps_db = lumpy_db * collapse * wander(hz=22)  # collapsed slush tumbles in heaps
    swirl_db = bite_db + heaps_db - SAG_DB_PER_S * idle_s - settle_db_per_s * fallen_s
    levels = []
    for db, surge_db, surge_s, drift_db_per_s, drop_db in (GRIND_LAYER, SLOSH_LAYER, SPRAY_LAYER):
        surge = surge_db * np.exp(-age_s / surge_s)
        change = surge + drift_db_per_s * age_s - drop_db * collapse
        levels.append(swirl_db + db + change + swell_db * wander(hz=9.8))
    grind_db, slosh_db, spray_db = levels
    delay_s, spread_s, slap_db = WALL_SLAP
    slap = slap_db * np.exp(-((idle_s - delay_s) / spread_s) ** 2)
    return grind_db + coarse_db, slosh_db + slush_db + slap, spray_db + fine_db


def slump(slosh_db):
    """Unpowered slush sinks over the blade: noise gurgle with a falling resonance."""
    start_hz, fall_hz_per_s, rise_s, width_hz, db = SLUMP_GURGLE
    idle_s = presses()[1]
    hz = np.maximum(start_hz - fall_hz_per_s * idle_s, BASE_MODES[0][0])
    carrier = np.exp(2j * np.pi * np.cumsum(hz) / SR)
    band = contact(noise() + 1j * noise(), hz=width_hz / 2)
    gurgle = evened((carrier * band).real)
    return amp(slosh_db + db) * np.minimum(idle_s / rise_s, 1) * gurgle


def grains(full_per_s, spread_db, wash, busy):
    """Uneven random clicks over a wash of tiny ones; fewer and more distinct in slow slush."""
    size = amp(spread_db * np.minimum(rng.exponential(1, N), 4)) * rng.choice([-1, 1], N)
    clicks = size * (rng.random(N) < full_per_s * busy / SR) / np.sqrt(busy)
    return evened(evened(clicks) + wash * np.sqrt(busy) * noise())


def slush(speed_hz, turns, grind_db, slosh_db, spray_db):
    """Grains rattle jar and table, slosh and spray, in clumps and in step with the blade."""
    busy = np.clip(speed_hz / REF_SPEED_HZ, .2, 1) ** 1.3
    clumps = wander(hz=58.6) / busy ** 0.15
    sweep = 1 + 0.062 * np.cos(2 * np.pi * turns)
    rattle = grains(450, spread_db=1.6, wash=.2, busy=busy) * sweep * amp(2 * clumps)
    liquid = grains(1500, spread_db=2.0, wash=0.53, busy=busy) * amp(1.5 * clumps)
    fines_db = 0.9 * clumps + 0.54 * wander(hz=150)
    fines = grains(2000, spread_db=2.5, wash=0.75, busy=busy) * sweep * amp(fines_db)

    jar = blow(ring(WALL_MODES)) + amp(-4) * blow(ring(BASE_MODES)) + amp(-9) * blow(ring(EDGE_MODES))
    grinding = amp(grind_db + 0.5) * through(rattle, contact(jar, hz=2660, order=4))
    shaking = through(noise(), contact(ring(TABLE_MODES, size=8192), hz=360))
    table = amp(-14) * np.hypot(amp(grind_db), amp(slosh_db)) * busy ** 0.17 * shaking
    sloshing = amp(slosh_db) * through(liquid, colour(SLOSH_SPECTRUM))
    spraying = amp(spray_db - 0.1) * through(fines, colour(SPRAY_SPECTRUM, ripple_db=1.1))
    rim = amp(spray_db - 7) * through(liquid, ring(RIM_MODES))
    return grinding + table + sloshing + spraying + rim


def chips(spray_db, count=90):
    """Crack rows at random moments; they follow the spray and stand out as it dies."""
    db, spread_db, clack_db, clear_db_per_s = CHIP_LEVELS
    at = scattered(count)
    snap, clack, pitch = spread_db * np.clip(rng.standard_normal((count, 3)), -2, 2).T
    level_db = spray_db[at] + db + snap + clear_db_per_s * presses()[1][at]
    return [(s, snap_db, CHIP_TOP_HZ, snap_db + clack_db + extra_db, CHIP_CLACK_HZ * ratio, CHIP_CRUMBLE_S)
            for s, snap_db, extra_db, ratio in zip(at / SR, level_db, clack, amp(pitch))]


def cracks_and_clicks(rows, crumble=1.0, scrape=0.15, scrape_s=0.0088):
    """Each row: a sharp snap with a short crumble, and a pitched clack with a brief scrape."""
    out, t = np.zeros(N), np.arange(1024) / SR
    for s, snap_db, top_hz, clack_db, clack_hz, crumble_s in rows:
        split = (t == 0) + crumble * rng.standard_normal(len(t)) * np.exp(-t / crumble_s)
        touch = (t == 0) + scrape * rng.standard_normal(len(t)) * np.exp(-t / scrape_s)
        snap = signal.fftconvolve(split, colour(SNAP_SPECTRUM, ripple_db=2, size=1024))
        pitched = [(k * clack_hz, db) for k, db in CLACK_SPECTRUM]
        clack = signal.fftconvolve(touch, colour(pitched, ripple_db=1.5, size=1024))
        add(out, s, amp(snap_db) * blow(contact(snap, hz=top_hz, order=4)))
        add(out, s, amp(clack_db) * blow(clack))
    return out


def tumble(rebound, rebound_s, count=5, size=600):
    """One blow and a few weaker ones as the lump tumbles along the wall."""
    place, strength = rng.random((2, count))
    at = ((.1 + .9 * place) * size).astype(int)
    push = np.zeros(size)
    push[at] = rebound * strength * np.exp(-at / SR / rebound_s)
    push[0] = 1
    return push


def small_knocks(grind_db, count=130):
    """Rows of lighter knocks at random moments, as strong as the grinding allows."""
    db, spread_db, thump_db, thump_spread_db = SMALL_KNOCK_LEVELS
    at = scattered(count)
    size, thump, tilt = np.clip(rng.standard_normal((count, 3)), -2, 2).T
    level_db = db + grind_db[at] - GRIND_LAYER[0] + spread_db * size
    return list(zip(at / SR, level_db, thump_db + thump_spread_db * thump, spread_db * tilt))


def knocks(rows, wall_db=-12, thump_db=-5, edge_db=-19, edge_follows=.6, wall_hz=1500, lag_s=.0012):
    """Each lump rings the wall with its own brightness; the heavy base follows."""
    out = np.zeros(N)
    for s, db, thump, tilt in rows:
        push = -tumble(rebound=.8, rebound_s=0.008)
        modes = [(hz, width, mode_db + tilt * np.log2(hz / wall_hz)) for hz, width, mode_db in WALL_MODES]
        wall = blow(ring(modes, scatter_db=2, detune=.02))
        edge = blow(ring(EDGE_MODES, scatter_db=2, detune=.025))
        jar = wall + amp(edge_db - wall_db + edge_follows * tilt) * edge
        base = blow(contact(ring(BASE_MODES, scatter_db=2.5, detune=.035), hz=900))
        add(out, s, amp(db + wall_db) * blow(signal.fftconvolve(push, jar)))
        add(out, s + lag_s, amp(db + thump + thump_db) * base)
    return contact(out, hz=2616, order=6)


def scene(room_db=-14, side_db=-29):
    """Blender on its table, with a little kitchen reverberation, hush and hum."""
    speed_hz = shaft()
    grind_db, slosh_db, spray_db = work()
    # lumps jolt the shaft, the more the coarser the ice
    jolt = .003 * amp(2 * (grind_db - GRIND_LAYER[0]))
    turns = np.cumsum(speed_hz * (1 + jolt * wander(hz=40.5))) / SR
    blender = motor(speed_hz, turns) + slump(slosh_db)
    blender += slush(speed_hz, turns, grind_db, slosh_db, spray_db)
    blender += cracks_and_clicks(chips(spray_db) + list(CRACKS_AND_CLICKS))
    blender += knocks(small_knocks(grind_db) + list(BIG_KNOCKS))
    mid = blender + amp(room_db) * kitchen(blender) + room_hush() + mains_hum()
    side = amp(side_db) * kitchen(blender)  # the microphone is all but mono
    return np.array([mid + side, mid - side])


def record(dry):
    """Firm ceiling on the highest peaks, then the band limit."""
    rounded = dry / (1 + (dry / .95) ** 8) ** (1 / 8)
    lowpass = signal.firwin(511, BAND_LIMIT_HZ, window=("kaiser", 9), fs=SR)
    return signal.oaconvolve(rounded, lowpass[None], "same")


dry = scene()
out = record(dry)
inscribe(out)
```